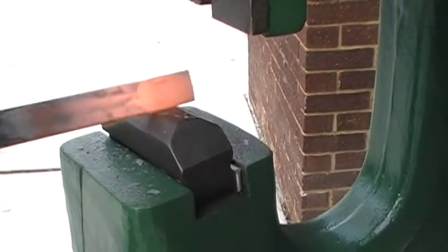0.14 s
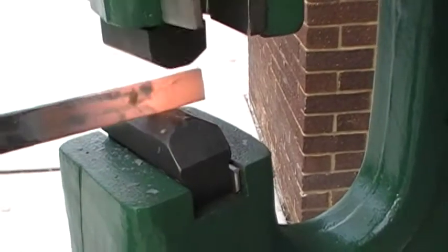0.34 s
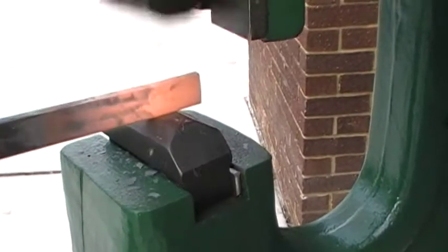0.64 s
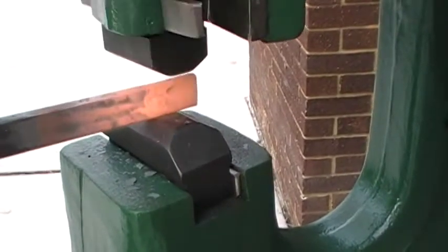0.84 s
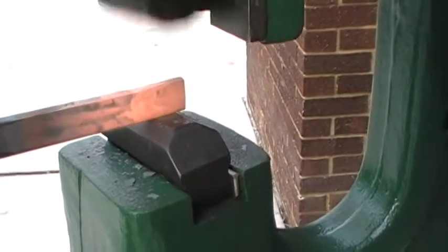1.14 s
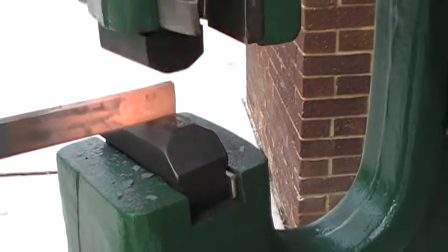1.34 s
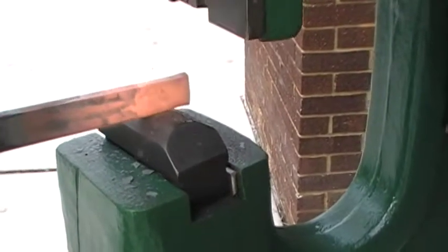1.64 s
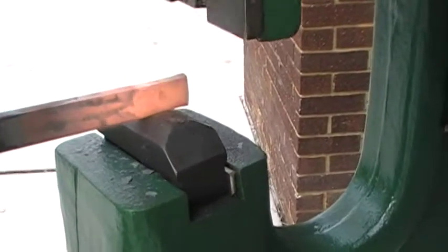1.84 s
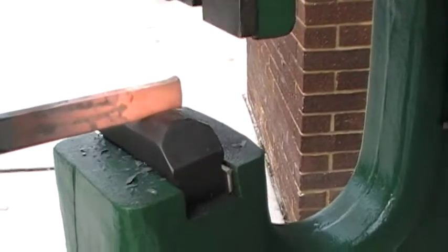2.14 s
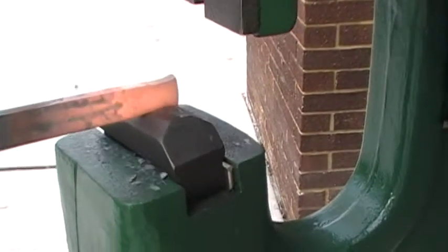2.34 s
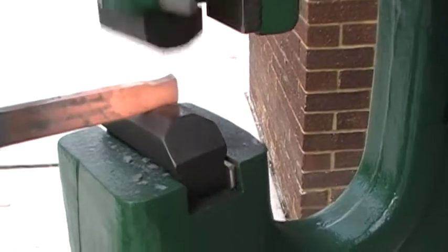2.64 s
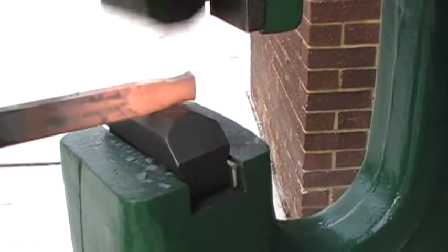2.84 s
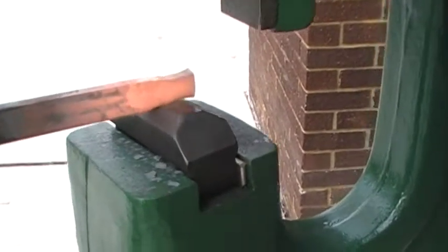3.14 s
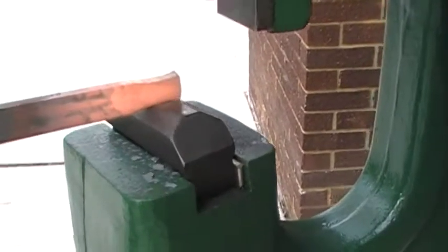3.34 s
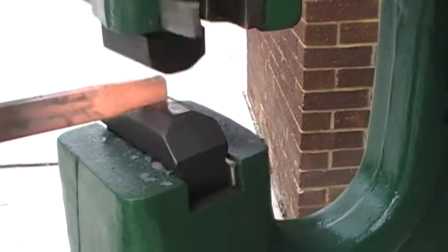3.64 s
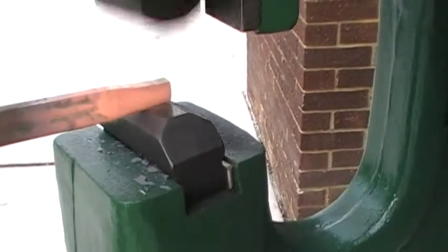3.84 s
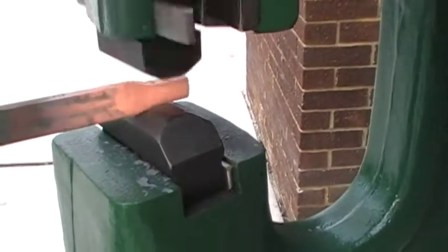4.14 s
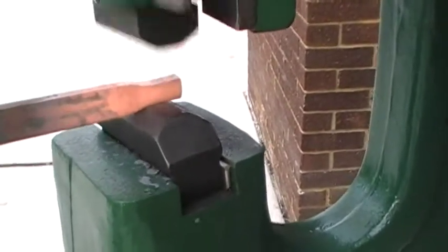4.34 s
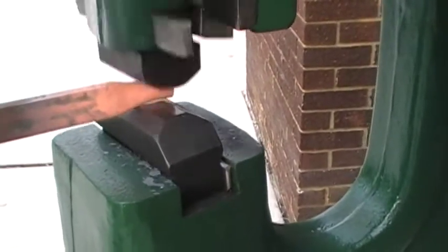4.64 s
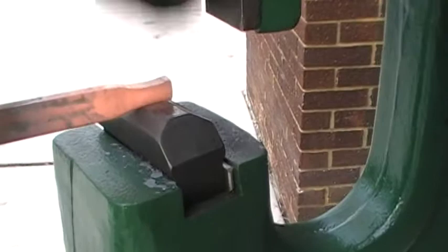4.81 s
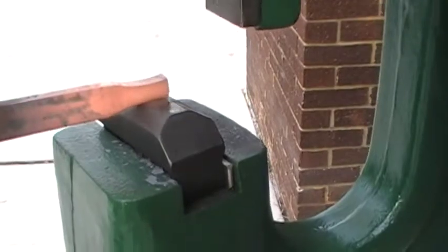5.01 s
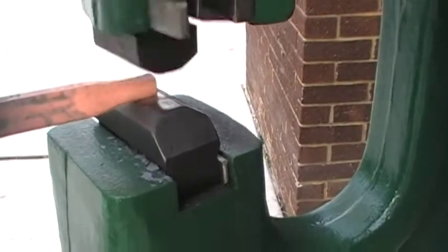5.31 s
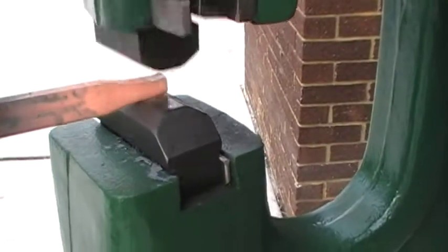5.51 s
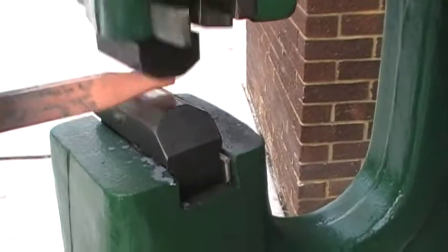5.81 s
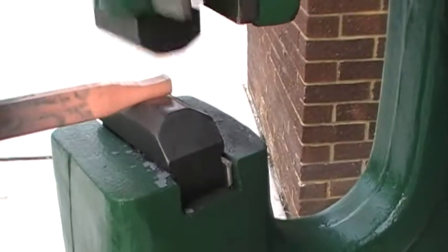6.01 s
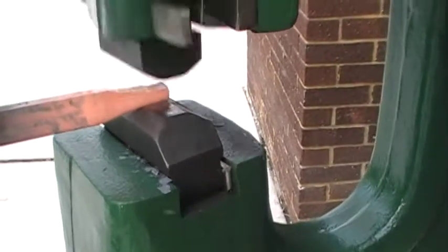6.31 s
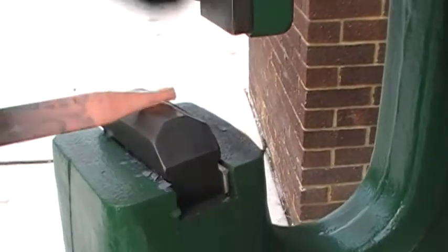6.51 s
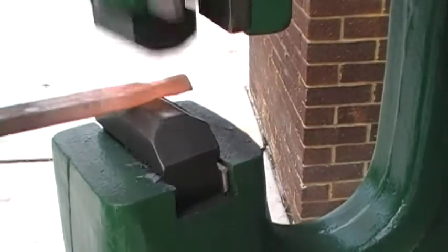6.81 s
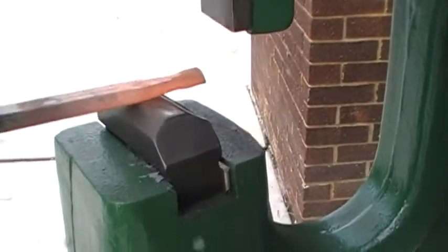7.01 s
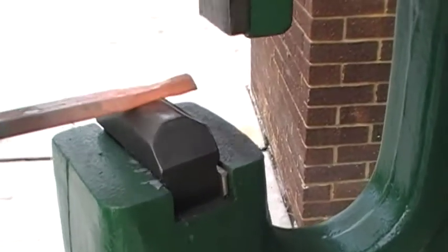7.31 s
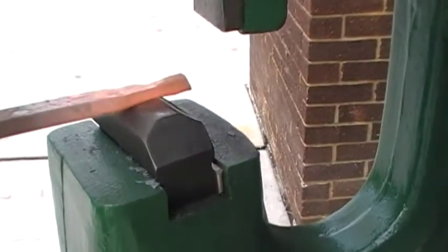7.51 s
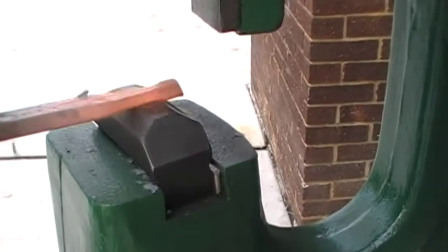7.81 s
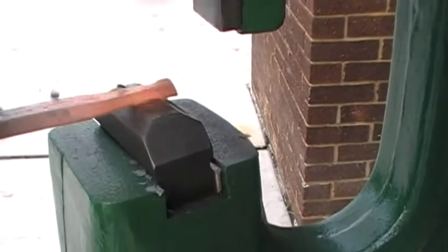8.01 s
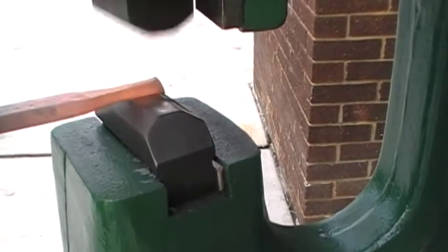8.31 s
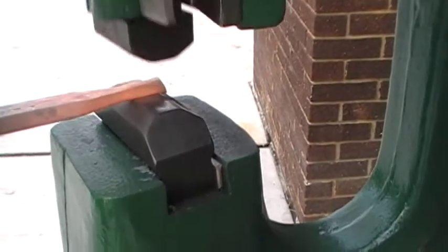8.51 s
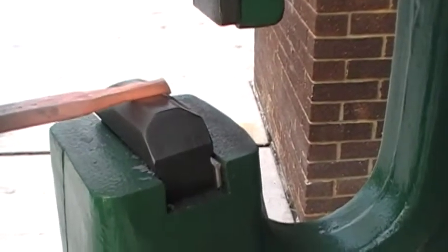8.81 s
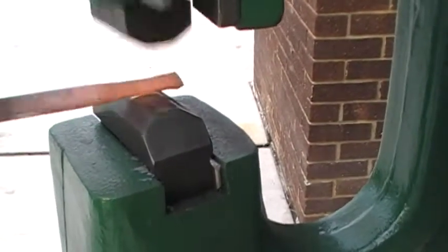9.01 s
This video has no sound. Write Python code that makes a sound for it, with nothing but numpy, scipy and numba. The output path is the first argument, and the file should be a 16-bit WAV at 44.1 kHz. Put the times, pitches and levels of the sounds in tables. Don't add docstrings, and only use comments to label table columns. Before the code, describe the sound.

A crank-driven power hammer forges a hot bar, heard very close outdoors beside a brick wall. Each turn gives a small slack tick, a heavy dull metal blow, then a bright clack as the linkage snaps over. It starts at about four strokes a second, speeds to six, eases and surges again twice, then slows. Castings ring briefly, guides rattle, and motor and belt rumble beneath. Loud hits are flattened by limiting.

```python
import sys
import numpy as np
from scipy import signal
from scipy.fft import rfft, irfft, next_fast_len
from scipy.io import wavfile
from scipy.ndimage import uniform_filter1d, map_coordinates
from numba import njit

SR = 44100
rng = np.random.default_rng(int(sys.argv[2]) if len(sys.argv) > 2 else 0)


def boost(x):
    u = np.asarray(x, float) / 20
    return 10 ** u


def generate_wav(signal):
    frames = np.transpose(np.atleast_2d(signal))
    scaled = np.clip(frames, -1, 1) * 32767
    pcm = np.round(scaled).astype(np.int16)
    wavfile.write(sys.argv[1], SR, pcm)


N = 403515


def along(points, hz):
    f, v = np.transpose(points)
    return np.interp(np.log(hz + 1), np.log(f + 1), v)


def filtered(x, response):
    m = next_fast_len(N + SR // 2)
    return irfft(rfft(x, m) * response(np.fft.rfftfreq(m, 1 / SR)), m)[..., :N]


def causal(gain):
    cepstrum = irfft(np.log(gain + 1e-6))
    half = len(cepstrum) // 2
    cepstrum[1:half] *= 2
    cepstrum[half + 1:] = 0
    return np.exp(rfft(cepstrum))


def slow_noise(per_s):
    return map_coordinates(rng.standard_normal(N * per_s // SR + 4), [np.arange(N) * per_s / SR])


# frequency in Hz, side minus mid in dB.
STEREO_WIDTH = [(40, 9), (90, 2.5), (170, -0.5), (300, -9.5), (1300, -10.5), (2500, -9), (5000, -9.5),
                (7500, -4.5), (15000, 3)]


def object_response(spectrum, modes, ring_db, side_db=-6.0):
    def response(f):
        ring = 0
        for centre, width, db in modes:
            ring = ring + boost(db + ring_db) * 1j * f * width / (centre * centre - f * f + 1j * f * width)
        mid = causal(boost(along(spectrum, f))) * (1 + ring)
        mid = mid / np.sqrt(np.mean(np.abs(mid) ** 2))
        side = mid * causal(boost(along(STEREO_WIDTH, f) + side_db))
        return np.array([mid, side])
    return response


def patchy(depth_db):
    z = signal.stft(rng.standard_normal((2, N)), nperseg=256)[2]
    field = uniform_filter1d(rng.standard_normal(z.shape[1:]), size=3, axis=0)
    field = uniform_filter1d(field, size=4, axis=1)
    force = signal.istft(z * boost(depth_db * field / field.std()), nperseg=256)[1][:, :N]
    return force / force.std()


def contacts(times, levels_db, t60s, rise, hold, response, push_db=-20):
    t = np.arange(SR // 4) / SR
    power, push = np.zeros(N + SR), np.zeros(N + SR)
    for s, db, t60, rise_s, kick_db in np.broadcast(times, levels_db, t60s, rise, push_db):
        swell = boost(db - 60 * (t / t60) ** hold) * (1 - np.exp(-t / rise_s))
        power[round(s * SR):][:len(t)] += swell ** 2
        push[round((s + min(rise_s, .002)) * SR)] += boost(db + kick_db)
    grit = boost(2 * slow_noise(per_s=500))
    chatter = np.sqrt(power[:N]) * grit * patchy(depth_db=3.0)
    return filtered(chatter + push[:N], response)


# blow in seconds, blow body in dB,
# blow edge in dB, delay to the clack in seconds, clack in dB.
FIRST_PRESS = [(0.208, -15, -30, 0.066, -11.5), (0.467, -11, -32, 0.063, -7.5),
               (0.724, -12, -23, 0.063, -8), (0.977, -12, -24, 0.06, -10),
               (1.2212, -14.5, -20.5, 0.056, -11), (1.4541, -13, -24, 0.055, -14.5),
               (1.6695, -13, -25, 0.048, -13), (1.8603, -18, -18, 0.043, -13),
               (2.0312, -9, -10.5, 0.036, -13), (2.1912, -7.5, -12.5, 0.041, -14.5),
               (2.3674, -6.5, -7.5, 0.047, -16.5), (2.547, -8.5, -12, 0.04, -10.5),
               (2.7293, -14, -17.5, 0.041, -12), (2.9239, -13.5, -24, 0.043, -10.5),
               (3.141, -14, -26, 0.053, -10.5)]
SECOND_PRESS = [(3.4005, -14, -27, 0.056, -11), (3.58, -8, -14, 0.032, -13),
                (3.747, -7.5, -10, 0.04, -11.5), (3.9095, -7.5, -11, 0.043, -15),
                (4.0832, -10, -12, 0.038, -12), (4.251, -6.5, -8.5, 0.041, -13.5),
                (4.4273, -10, -13, 0.042, -12.5), (4.603, -10.5, -15.5, 0.044, -13.5),
                (4.792, -19.5, -23.5, 0.047, -9.5), (4.999, -14, -24, 0.051, -12.5),
                (5.2304, -14, -29, 0.059, -12.5)]
THIRD_PRESS = [(5.448, -6, -12, 0.045, -12), (5.6061, -8, -11, 0.039, -14), (5.7687, -5, -8.5, 0.047, -15),
               (5.934, -8, -10, 0.043, -13), (6.095, -7.5, -9.5, 0.04, -12), (6.255, -6, -7.5, 0.042, -14),
               (6.416, -7.5, -7.5, 0.045, -17), (6.5731, -9, -11.5, 0.039, -11.5),
               (6.7268, -8.5, -10.5, 0.038, -18), (6.8885, -11, -12, 0.036, -13.5),
               (7.047, -10, -11.5, 0.036, -10.5), (7.2055, -10.5, -10, 0.035, -11.5),
               (7.3584, -9, -10.5, 0.037, -12), (7.5177, -11, -14.5, 0.037, -12.5),
               (7.6779, -9.5, -11, 0.039, -13), (7.8267, -9.5, -17.5, 0.035, -12),
               (8.0017, -9.5, -15, 0.044, -11.5), (8.1912, -14.5, -24, 0.047, -14),
               (8.4173, -13.5, -27.5, 0.056, -13), (8.66, -14, -28, 0.065, -11),
               (8.893, -13, -25, 0.063, -7.5), (9.116, -15, -29, 0.035, -17)]


def turns():
    columns = np.transpose(FIRST_PRESS + SECOND_PRESS + THIRD_PRESS)
    slow_turn_s, fast_turn_s = .25, .16
    pace = (slow_turn_s - np.gradient(columns[0])) / (slow_turn_s - fast_turn_s)
    pace = np.clip(pace, 0, 1)
    return columns, lambda pair: pair[0] + (pair[1] - pair[0]) * pace


# frequency in Hz, width in Hz, level in dB.
RAM_MODES = [(520, 114, -4), (603, 7.6, -2), (764.6, 32, -8), (930, 150, -10.5), (1345, 107, -2.5),
             (1783, 105, -5.5), (1930, 54, -11.5), (2562, 33, -7), (2900, 18, -26)]
# frequency in Hz, width in Hz, level in dB.
PIN_MODES = [(3245, 45, -1), (4385, 50, -1), (4792, 70, -3), (5110, 50, -2), (6500, 120, -2), (7832, 30, 1),
             (9115, 45, -1)]
# frequency in Hz, level in dB per Hz.
CASTING_COLOUR = [(25, -56), (130, -17), (300, -6), (600, 3), (1400, 0), (2800, -3), (3600, -15),
                  (8000, -24.5), (16000, -118)]
# frequency in Hz, level in dB per Hz.
DIE_COLOUR = [(200, -10), (1200, -1.5), (4000, -3), (6000, -7), (10000, -8), (15500, -34.5), (20000, -53)]


def ram():
    (s, body_db, edge_db, _, _), by_speed = turns()
    t60 = by_speed((0.059, 0.11))
    rise_s, push_db = by_speed((0.0018, 0.0058)), by_speed((18, 9.5))
    casting = object_response(CASTING_COLOUR, RAM_MODES, ring_db=3, side_db=-3)
    body = contacts(s, body_db + 4.0, t60, rise_s, 1.576, casting, push_db=push_db)
    crack_db = body_db + by_speed((-3.5, -2.5))
    upper_casting = object_response(CASTING_COLOUR, RAM_MODES[4:], ring_db=10.5)
    crack = contacts(s, crack_db, 0.034, 0.00081, 1.84, upper_casting, push_db=26.0)
    dies = object_response(DIE_COLOUR, PIN_MODES, ring_db=1.5)
    edge = contacts(s, edge_db - 0.07, 0.63 * t60, 0.0001, 1.8, dies)
    return body + crack + edge


def clacks():
    (s, _, _, after, body_db), by_speed = turns()
    edge_db, t60_s = (-12, -14), (0.064, 0.11)
    return (np.append(0.0335, s + after), np.append(-5.5, body_db),
            np.append(edge_db[0], by_speed(edge_db)), np.append(t60_s[0], by_speed(t60_s)))


# frequency in Hz, width in Hz, level in dB.
LINK_MODES = [(223, 65, -4.5), (346.6, 4.6, -0.5), (445, 46, -4), (793, 9.4, -9.5), (1157, 48, -6),
              (1340, 18, -0.5), (1733, 47, -10), (1945, 19, -9), (2640, 36, -19)]
# frequency in Hz, level in dB per Hz.
SNAP_COLOUR = [(200, -7.5), (1000, 5), (3000, 3), (6000, 0.5), (9500, -2), (12000, -14), (15500, -26),
               (20000, -88)]


def linkage():
    s, body_db, edge_db, t60 = clacks()
    arms = object_response(CASTING_COLOUR, LINK_MODES, ring_db=8.5, side_db=0.0)
    body = contacts(s, body_db + 6.0, t60, 0.0082, 1.446, arms)
    pins = object_response(SNAP_COLOUR, PIN_MODES, ring_db=-3, side_db=0)
    edge = contacts(s, edge_db + 3.0, 0.79 * t60, 0.00062, 1.606, pins)
    return body + edge


def ringing(times, levels_db, modes):
    out, t = np.zeros(N + SR), np.arange(SR // 4) / SR
    hz, db, t60 = np.transpose(modes)[..., None]
    variation = rng.standard_normal((len(times), 2, len(modes), 1))
    for s, level_db, (gain, drift) in zip(times, levels_db, variation):
        decay = boost(level_db + db + 3 * gain - 60 * t / t60)
        partials = decay * np.sin(2 * np.pi * hz * (1 + 0.0127 * drift) * t)
        out[round(s * SR):][:len(t)] += partials.sum(axis=0) * (1 - np.exp(-t / 0.00087))
    return np.array([out[:N], .3 * np.roll(out[:N], 9)])


# frequency in Hz, level in dB, t60 in seconds.
RAM_PARTIALS = [(783, -6.5, .16), (1367, 2.5, 0.21), (1800, -17, .12), (1957, -1, 0.26), (2540, -2, 0.099),
                (2710, -7, 0.09)]
# frequency in Hz, level in dB, t60 in seconds.
LINK_PARTIALS = [(1100, -17, 0.089), (1410, -6.5, 0.089), (2060, -3, 0.13), (2589, -19, 0.11),
                 (3200, -10, .09), (4382, -8, 0.1), (5110, -6, 0.098), (6440, -17, .12), (7830, -12, 0.12),
                 (8650, -28, 0.13)]


def steel():
    (s, body_db, *_), _ = turns()
    snap_s, snap_db, *_ = clacks()
    ram_ring = ringing(s, np.minimum(body_db, -9) - 9.5, RAM_PARTIALS)
    return ram_ring + ringing(snap_s, snap_db - 8.5, LINK_PARTIALS)


# time in seconds, low ring in dB,
# column in dB.
SET_RINGS = [(0.034, -49, -54), (0.272, -36.5, -48), (0.53, -31, -48), (1.037, -34.5, -48),
             (1.275, -41, -46), (1.717, -38.5, -40), (3.454, -36, -38), (4.648, -50, -28),
             (8.958, -32, -44), (0.788, -37, -50), (1.506, -39, -42), (1.9072, -52, -18.5),
             (2.069, -48, -22), (2.2307, -36.5, -25), (2.591, -47, -29), (2.772, -48, -18),
             (2.9726, -37, -16), (3.198, -41, -25), (3.9503, -30, -37), (4.124, -44, -28),
             (4.294, -53, -30), (4.4699, -54, -23), (4.8378, -49, -24), (5.0517, -45, -47),
             (5.291, -45, -39), (5.491, -47, -19.5), (5.646, -39, -37), (6.297, -27.5, -30),
             (6.4574, -33, -24), (6.768, -33, -17), (7.086, -28, -23), (7.243, -36, -25),
             (7.397, -31, -23), (7.56, -46, -27), (7.7168, -30, -24), (7.8717, -31, -37),
             (8.724, -36, -40)]


def frame():
    out, t, every = np.zeros(N + SR), np.arange(SR // 2) / SR, clacks()[0]
    rings = np.array([(s, -36.5, -39) for s in every])
    rings[:, 1:] += 6 * rng.standard_normal((len(every), 2))
    for row in SET_RINGS:
        rings[np.argmin(np.abs(every - row[0]))] = row
    variation = rng.uniform(-1.26, 1, (len(rings), 2))
    for (s, low_db, column_db), (drift, turn) in zip(rings, variation):
        low_hz = (293 if s > 5.72 else 235.6) * (1 + 0.024 * drift)
        low = boost(low_db + 14.5 - 60 * t / 0.24) * (1 - np.exp(-t / 0.0057))
        low = low * np.sin(2 * np.pi * low_hz * t)
        beating = np.cos(np.pi * (9 + 4 * drift) * t + 0.6 * turn)
        column = boost(column_db + 0.5 - 60 * t / 0.85) * beating * (1 - np.exp(-t / 0.0049))
        column = column * np.sin(2 * np.pi * 349 * t + np.pi * turn)
        out[round(s * SR):][:len(t)] += low + column
    return np.array([out[:N], 0.16 * np.roll(out[:N], 32)])


# time in seconds, body in dB, edge in dB.
SLACK_TICKS = [(.178, -30, -49), (.4465, -18.5, -37), (.7, -25, -44), (0.957, -16.5, -38),
               (1.204, -17, -46), (1.427, -20.5, -42), (1.643, -23, -40), (1.843, -16.5, -36),
               (2.015, -18, -41), (2.178, -19, -38), (2.341, -19, -37), (2.524, -21.5, -40),
               (2.708, -18.5, -30), (2.8985, -22, -46), (3.119, -18.5, -38), (3.369, -23, -51),
               (3.564, -18, -30), (3.731, -10.5, -26), (3.893, -17, -36), (4.064, -19, -39),
               (4.2235, -20, -32), (4.409, -18.5, -43), (4.585, -18.5, -34), (4.773, -20.5, -42),
               (4.98, -23, -47), (5.201, -19.5, -52), (5.428, -20.5, -44), (5.587, -25, -32),
               (5.744, -18.5, -32), (5.918, -22, -36), (6.078, -18, -26), (6.241, -19, -25),
               (6.397, -16.5, -27), (6.556, -20, -25), (6.713, -17, -29), (6.878, -15.5, -37),
               (7.03, -25, -43), (7.19, -29, -30), (7.345, -23, -26), (7.491, -19.5, -39),
               (7.661, -19, -31), (7.81, -19, -31), (7.986, -16, -28), (8.162, -20, -36),
               (8.385, -24.5, -40), (8.633, -25, -51), (8.868, -23, -44), (9.094, -21.5, -41)]
# time in seconds, body in dB, edge in dB.
STRAY_RATTLES = [(0.002, -19.5, -29), (0.259, -17, -25), (0.419, -28, -30), (0.669, -27, -46),
                 (0.7667, -21.5, -48), (0.866, -29, -31), (0.892, -46, -27), (0.925, -22, -50),
                 (1.022, -18, -27), (1.142, -35, -29), (1.383, -27, -29), (1.884, -13.5, -18),
                 (2.2905, -19.5, -19.5), (2.4867, -27, -24.5), (3.042, -29, -27), (3.298, -32, -37),
                 (3.306, -31, -23), (.186, -17, -40), (0.344, -24.5, -42), (.383, -34, -38),
                 (1.105, -32, -36), (1.182, -42, -44), (1.442, -21, -43), (2.152, -27, -28),
                 (4.184, -40, -30), (5.219, -29, -40), (5.705, -40, -31), (6.192, -40, -23),
                 (7.179, -26, -35), (8.876, -22, -40), (3.178, -20, -50), (2.95, -38, -46),
                 (.703, -36, -38), (0.599, -25, -35), (.855, -25, -46), (1.35, -34, -44), (8.345, -31, -48),
                 (8.54, -31, -48), (7.759, -30, -18), (5.035, -40, -38), (3.437, -17.5, -34),
                 (3.683, -47, -23), (3.871, -20, -31), (4.816, -14.5, -34), (4.96, -22, -46),
                 (5.032, -19, -45), (5.2635, -24, -21), (8.099, -29, -31), (8.125, -44, -28),
                 (8.408, -38, -38), (8.525, -34, -26), (6.355, -40, -25), (6.515, -42, -20),
                 (6.67, -42, -19)]
# frequency in Hz, level in dB per Hz.
LIGHT_COLOUR = [(200, -22), (1200, -6), (4000, 1), (6000, -11), (9000, -3.5), (11000, -18), (13000, -45),
                (20000, -92)]


def guides():
    s, body_db, _ = np.transpose(SLACK_TICKS + STRAY_RATTLES)
    casting = object_response(CASTING_COLOUR, RAM_MODES, ring_db=7.5)
    body = contacts(s, body_db + 1.0, 0.29, 0.00144, 0.8, casting, push_db=9.5)
    s, _, edge_db = np.transpose(SLACK_TICKS)
    light_pins = object_response(LIGHT_COLOUR, PIN_MODES, ring_db=-4)
    ticks = contacts(s, edge_db + 2, 0.14, 0.0051, 1.5, light_pins, push_db=8)
    s, _, edge_db = np.transpose(STRAY_RATTLES)
    bright_pins = object_response(SNAP_COLOUR, PIN_MODES, ring_db=-5.0)
    strays = contacts(s, edge_db + 1.5, 0.062, 0.0011, 0.77, bright_pins, push_db=8)
    return body + ticks + strays


# time in seconds, low mode in dB, upper mode in dB, upper mode in Hz.
BAR_BOUNCES = [(1.794, -32, -15, 400), (2.078, -23, -8, 425), (2.116, -33, -2.5, 460),
               (2.153, -17.5, -12.5, 380), (2.274, -23, -8, 430), (3.077, -38, -16, 250),
               (3.308, -32, -20, 420), (3.532, -15, -11.5, 490), (3.661, -23, -9.5, 434),
               (4.303, -34, -21, 520), (4.659, -32, -11, 445), (6.652, -12, -16, 367),
               (6.811, -18, -8, 475), (6.85, -15.5, -3, 476), (6.917, -14, -8, 370), (7.133, -11, -6, 597),
               (7.171, -13, -11, 362), (7.279, -26, -7, 445), (7.314, -20, -9, 454), (7.449, -8, -1.5, 437),
               (7.487, -11, -14, 550), (7.546, -16, -9, 624), (7.765, -15.5, -3, 488),
               (7.798, -18, -22, 590), (7.917, -11.5, -7, 543), (7.956, -33, -16, 436),
               (7.986, -16, -11, 455), (8.03, -17.5, -7, 433), (8.313, -23, -18.5, 400),
               (8.755, -20, -27, 400), (8.599, -30, -38, 357), (9.053, -24, -40, 364)]


def bar():
    out, t = np.zeros(N + SR), np.arange(SR // 5) / SR
    drifts = rng.normal(1, 0.031, (len(BAR_BOUNCES), 1))
    for (s, low_db, upper_db, upper_hz), drift in zip(BAR_BOUNCES, drifts):
        low = boost(low_db + 18 - 60 * t / 0.055) * np.sin(2 * np.pi * 292 * drift * t)
        upper = boost(upper_db + 19.5 - 60 * t / 0.025) * np.sin(2 * np.pi * upper_hz * t * (1 - 3 * t))
        swell = (1 - np.exp(-t / 0.0067)) ** 2
        out[round((s - .0025) * SR):][:len(t)] += (low + upper) * swell
    return np.array([out[:N], 0.12 * np.roll(out[:N], 30)])


def knocks():
    s, _, upper_db, _ = np.transpose(BAR_BOUNCES)
    die = object_response(CASTING_COLOUR, RAM_MODES[:3], ring_db=27)
    return contacts(s, upper_db - 2.5, 0.053, 0.00064, 0.93, die)


# frequency in Hz, level in dB per Hz.
DRIVE_COLOUR = [(15, -46), (25, -26), (117, -37.5), (217, 0), (301, -6), (591, 3.5), (1190, -6.5),
                (1370, -4.5), (2610, -16), (3520, -31), (9070, -29.5), (12000, -43), (16000, -84)]
# time in seconds, level in dB.
DRIVE_EFFORT = [(0.0, -22), (0.07, -30), (0.84, -28.5), (1.53, -30.5), (2.09, -24.5), (2.6, -28.5),
                (3.44, -31.5), (3.67, -26), (4.33, -26.5), (5.33, -31), (5.68, -18), (6.04, -28.5),
                (6.52, -25.5), (6.75, -24.5), (7.87, -24), (8.48, -31), (9.15, -29.5)]


def drive():
    s, db = np.transpose(DRIVE_EFFORT)
    lumps = slow_noise(per_s=30)
    level = boost(np.interp(np.arange(N) / SR, s, db) - 4.0 + 4.5 * lumps)
    machine = object_response(DRIVE_COLOUR, LINK_MODES[:3], ring_db=-8, side_db=-13.5)
    return level * filtered(rng.standard_normal((2, N)), machine)


def rattles(count=120):
    s, db = np.transpose(DRIVE_EFFORT)
    when = rng.uniform(0, N / SR, count)
    size = np.minimum(rng.exponential(1, count), 3)
    level_db = np.interp(when, s, db) - 14 + 2.5 * size
    loose = object_response(LIGHT_COLOUR, PIN_MODES, ring_db=4)
    return contacts(when, level_db, 0.033, .0004, 0.86, loose, push_db=4)


# frequency in Hz, level in dB per Hz.
GROUND_COLOUR = [(20, 2), (60, -4), (130, -1.5), (220, -4.5), (400, -42), (1000, -120)]


def ground():
    hum = filtered(rng.standard_normal((2, N)), lambda hz: boost(along(GROUND_COLOUR, hz)))
    return boost(-55) * hum / hum.std()


# frequency in Hz, t60 in seconds.
YARD_DECAY = [(150, 0.23), (500, 0.28), (1500, 0.17), (5000, 0.24), (12000, 0.12)]


def yard(x):
    hz, t, z = signal.stft(rng.standard_normal((2, SR // 2)), SR, nperseg=256)
    tail = signal.istft(z * boost(-60 * t / along(YARD_DECAY, hz)[:, None]), SR, nperseg=256)[1]
    delayed = np.pad(x, (300, 0))[None]
    return signal.fftconvolve(delayed, tail / np.linalg.norm(tail[0]), axes=1)[:, :N]


def scene():
    hits = ram() + linkage() + guides() + bar() + knocks() + steel()
    echo = boost([[-15], [-20]]) * yard(hits[0])
    mid, side = hits + echo + frame() + drive() + rattles() + ground()
    return np.array([mid + side, mid - side])


@njit
def follow(x, up, down):
    out, level = np.empty(len(x)), 0.0
    for i in range(len(x)):
        level += (up if x[i] > level else down) * (x[i] - level)
        out[i] = level
    return out


def low_pass(x):
    return signal.sosfilt(signal.butter(12, 16470, fs=SR, output="sos"), x)


def record(dry):
    attack_s, release_s, limit_db, ceiling = 0.00056, 0.004, -4.5, .85
    bass_cut_hz, top_hz = 59, 16100
    bright = np.abs(dry + 0.39 * np.diff(dry, prepend=0))
    level = np.array([follow(channel, 1 / (attack_s * SR), 1 / (release_s * SR)) for channel in bright])
    held = dry / np.maximum(1, level / boost(limit_db))
    soft = held / (1 + np.abs(held / ceiling) ** 4) ** (1 / 4)

    def band(hz):
        return np.clip((top_hz - hz) / 500, 0, 1) * 1j * hz / (bass_cut_hz + 1j * hz)
    mix = np.clip(filtered(soft, band), -1, 1)
    return low_pass(mix)


dry = scene()
out = record(dry)
generate_wav(out)
```